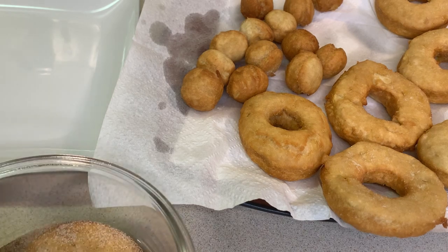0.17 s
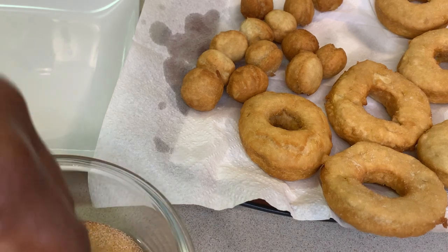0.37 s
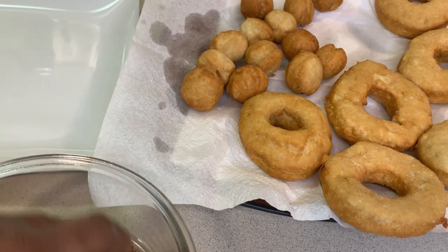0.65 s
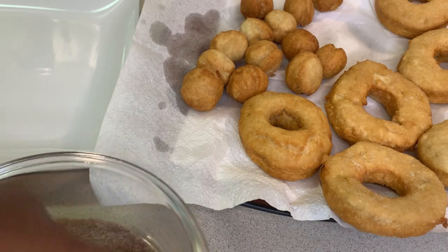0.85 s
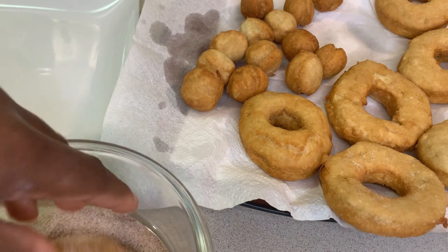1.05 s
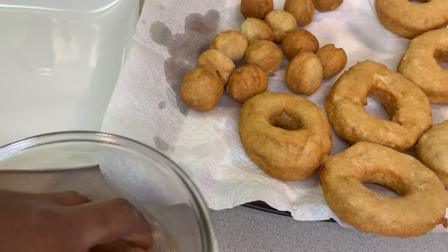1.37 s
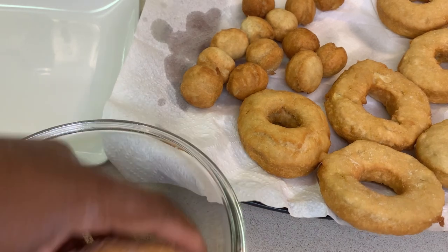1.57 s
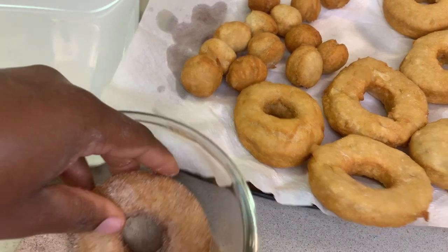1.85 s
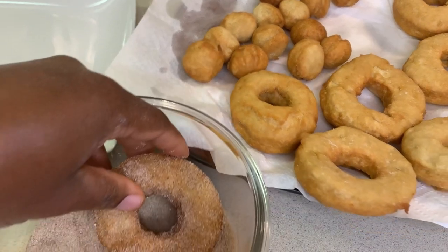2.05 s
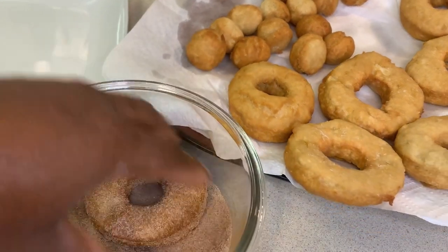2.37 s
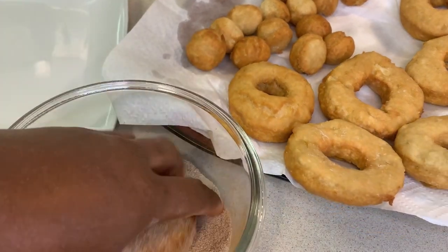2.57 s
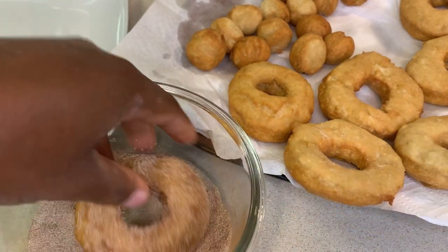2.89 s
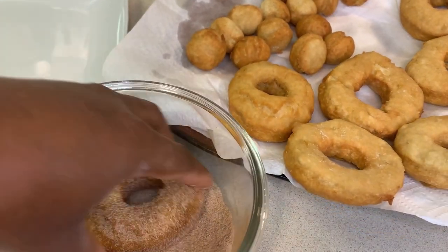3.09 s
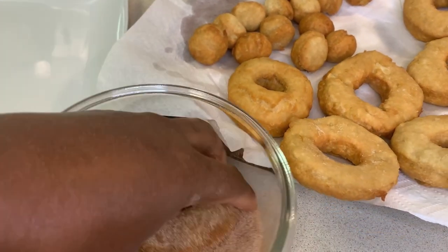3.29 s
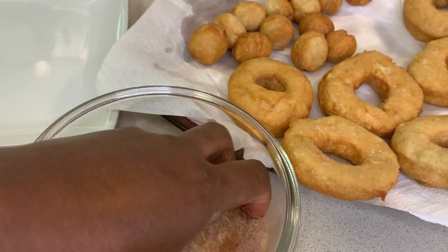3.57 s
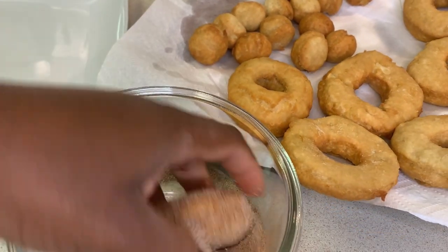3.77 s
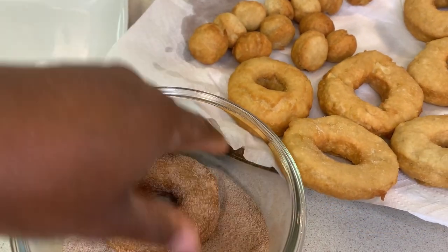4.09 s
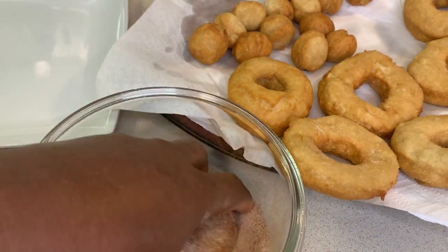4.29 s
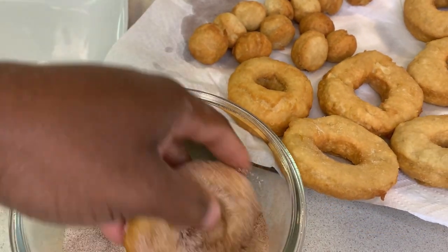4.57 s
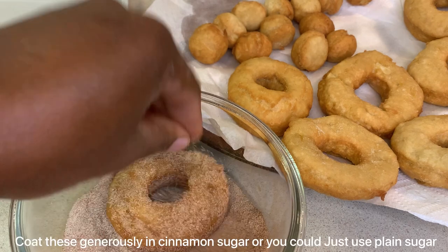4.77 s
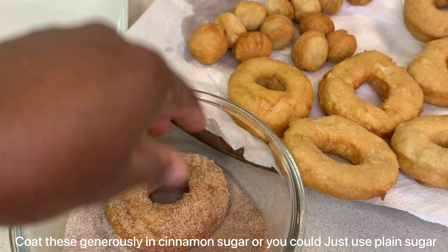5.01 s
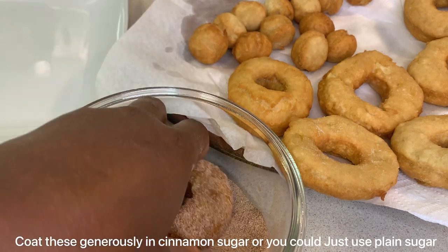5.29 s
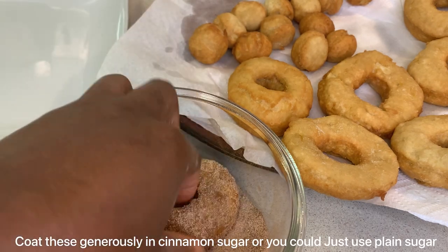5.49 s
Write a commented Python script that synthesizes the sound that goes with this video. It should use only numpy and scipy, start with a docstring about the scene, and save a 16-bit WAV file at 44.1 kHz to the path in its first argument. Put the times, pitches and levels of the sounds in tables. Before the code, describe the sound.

A doughnut is rustled through grainy sugar in a glass bowl, with crisp slaps, low thuds and two bright knocks over soft kitchen hum.

```python
"""Fingers rustle ticking sugar grains in a glass bowl over low kitchen hum, as friction drags the bowl.
From 0.7 s crust slaps sugar in crisp noise bursts, some over low counter thuds; near 1.5 s the bowl knocks
a baking tray, and near 1.9 s glass and counter ring: decaying modes under noise cracks. Stick-slip scrapes
follow at 2.1 s and 3.2 s, between them more slaps; a knuckle taps the held bowl near 3.7 s, then slaps and
thuds return until 4.8 s, and two last strokes end the scene. A nearby phone hears it all at two ports."""
import sys
import numpy as np
from scipy import signal
from scipy.fft import rfft, irfft, next_fast_len
from scipy.io import wavfile
from scipy.ndimage import uniform_filter1d

SR = 44100
rng = np.random.default_rng(int(sys.argv[2]) if len(sys.argv) > 2 else 0)


def dump(signal):
    """Clip the signal to [-1, 1] and save it as 16-bit WAV at the path in sys.argv[1]."""
    limited = np.clip(np.atleast_2d(signal).T, -1, 1)
    pcm = np.round(limited * 32767).astype(np.int16)
    wavfile.write(sys.argv[1], SR, pcm)


N = 248988
HZ = np.arange(next_fast_len(N) // 2 + 1) * SR / next_fast_len(N) + 1e-3  # frequency bins, kept off zero
PORT_LAG_S = 2.3e-4  # sound from the bowl reaches the right port later


def undb(db):
    """Decibels to amplitude."""
    return 10 ** (np.asarray(db) / 20)


def unit(x):
    """Scale to an RMS of 1."""
    return x / np.sqrt(np.mean(x ** 2))


def over_hz(table):
    """Read a (freq_hz, value) table at every frequency bin, straight between points on a log axis."""
    hz, value = np.transpose(table)
    return np.interp(np.log(HZ), np.log(hz), value)


def colour(x, gain):
    """Filter by a gain for each frequency bin."""
    size = next_fast_len(N)
    return irfft(rfft(x, size) * gain, size)[..., :N]


def band(x, lo_hz, hi_hz):
    """Gentle band-pass."""
    sos = signal.butter(2, [lo_hz, hi_hz], "bandpass", fs=SR, output="sos")
    return signal.sosfilt(sos, x)


def walk(rate):
    """Random levels held 1 / rate s and slewed twice; RMS 1."""
    hold = int(SR / rate)
    levels = np.repeat(rng.standard_normal(N // hold + 1), hold)
    return unit(uniform_filter1d(uniform_filter1d(levels, hold), hold)[:N])


def add(out, s, sound):
    """Mix a sound into out from s seconds on."""
    i = int(s * SR)
    out[..., i:i + sound.shape[-1]] += sound[..., :N - i]


def ports(x, lag_s, alike=0.97):
    """One source at two microphone ports: the right hears it lag_s later, partly by another path."""
    direct, other = x if x.ndim > 1 else (x, x)
    alike = np.clip(alike, 0, 1)
    late = np.exp(-2j * np.pi * HZ * lag_s)
    right = colour(direct, alike * late) + colour(other, np.sqrt(1 - alike ** 2) * late)
    return np.array([direct, right])


def ring(modes, dull_db, until_s, rung_s=0, soft_cycles=0, opposed=False, waver_db=0):
    """Decaying modes swell over the contact, and the next touch, until_s later, stops them."""
    t = np.arange(int(.5 * SR)) / SR
    hz, db, t60, pan_db, lead = np.array(modes).T[:, :, None]
    # dull_db per octave above 500 Hz; a negative value brightens
    gain = undb(db - dull_db * np.log2(np.maximum(hz / 500, 1))) * np.exp(-np.log(1000) * t / t60)
    # loose contact: random level steps, smoothed, make each mode die away unevenly
    steps = np.repeat(rng.standard_normal((len(hz), 40)), len(t) // 40 + 1, axis=1)[:, :len(t)]
    gain = gain * undb(waver_db * uniform_filter1d(steps, len(t) // 40, axis=1))
    # a body that has rung for rung_s keeps in step; in a flat or held one neighbours start opposed
    start = 2 * np.pi * hz * rung_s + opposed * np.pi * np.arange(len(hz))[:, None]
    start = start + np.array([lead, -lead]) / 2
    sides = undb(np.array([pan_db, -pan_db]) / 2)
    # a soft touch needs soft_cycles more to set a mode going, so the low ones come late
    swell = 1 - np.exp(-t / (0.0011 + soft_cycles / hz))
    stop = np.exp(-np.maximum(t - until_s, 0) / 0.003)
    return np.sum(swell * stop * sides * gain * np.sin(2 * np.pi * hz * t + start), axis=1)


# appliance spectrum, relative: freq_hz, density_db (per Hz)
KITCHEN_SPECTRUM = [(18, -56), (30, -43), (50, -4), (80, 1.5), (105, 0.5), (190, -6.5), (245, -0.5),
                    (440, -3), (575, -18.5), (890, -11.5), (1330, -24), (2500, -24.5), (7000, -25.5),
                    (16000, -59.5)]
# how alike the hum is at the two ports: freq_hz, likeness (0 to 1)
KITCHEN_LIKENESS = [(60, 0.95), (130, 0.98), (290, 0.72), (640, 0.52), (1100, 0.1), (2500, 0.474),
                    (5000, 0.059)]
KITCHEN_DB = -57.5  # middle level, before the phone


def kitchen():
    """Steady appliance rumble: shaped noise, its bass alike at both ports, its level wavering a little."""
    air = ports(rng.standard_normal((2, N)), PORT_LAG_S, alike=over_hz(KITCHEN_LIKENESS))
    hum = unit(colour(air, undb(over_hz(KITCHEN_SPECTRUM))))
    return hum * undb(KITCHEN_DB + 1.75 * walk(9.2))


# reverberation, each band taking the mean of its two edges: freq_hz, t60_s
ROOM_DECAY = [(150, 0.21), (600, 0.19), (2000, 0.48), (6000, 0.068), (15000, 0.12)]
ROOM_DB = -19  # tail energy


def room(x):
    """Hard kitchen walls: a noisy tail whose bands each die away at their own pace, soonest in the treble."""
    t, tail = np.arange(int(.5 * SR)) / SR, 0
    for (lo_hz, lo_t60), (hi_hz, hi_t60) in zip(ROOM_DECAY, ROOM_DECAY[1:]):
        both, apart = rng.standard_normal((2, len(t)))
        # long waves reach both ports alike
        paths = both + min(lo_hz / 600, 1) * apart * np.array([[1], [-1]])
        tail = tail + band(paths, lo_hz, hi_hz) * np.exp(-2 * np.log(1000) * t / (lo_t60 + hi_t60))
    tail = tail * (1 - np.exp(-t / 0.0025))
    tail = tail / np.sqrt(np.sum(tail ** 2, axis=1, keepdims=True))
    return undb(ROOM_DB) * signal.fftconvolve(x, tail, axes=1)[:, :N]


# doughnut and bowl on the counter: start_s, level_db (before the slow rise), pitch_hz, t60_s
THUDS = [(0.678, -30, 92.5, 0.08), (1.045, -28, 93.4, 0.082), (1.258, -48, 93, 0.11),
         (1.359, -39, 98, 0.11), (1.508, -14, 98, 0.044), (1.884, -33.5, 72.4, 0.13),
         (2.155, -52, 104, 0.66), (2.959, -22.5, 88.4, 0.086), (3, -25, 88, 0.057),
         (4.016, -27.5, 90, 0.078), (4.131, -43, 92, 0.079), (4.749, -20, 98, 0.073),
         (4.785, -24.5, 95, 0.052)]


def thuds():
    """The counter swings a few slow cycles after a soft push: decaying low sines with a slow rise."""
    out, t = np.zeros(N), np.arange(int(.4 * SR)) / SR
    for s, db, hz, t60 in THUDS:
        swell = (1 - np.exp(-t / 0.025)) * np.exp(-np.log(1000) * t / t60)
        add(out, s, undb(db) * swell * np.sin(2 * np.pi * hz * t))
    return ports(out, lag_s=1e-4)


# strokes of hand, crust and bowl:
# peak_s, rise_s, fall_s, rustle_db, fineness_db (per octave), drag_db
STROKES = [(0.04, 0.11, 0.058, -58, -2, -58.5), (0.18, 0.057, 0.17, -67, -4, -83),
           (0.45, 0.057, 0.11, -60.5, 0.5, -66), (0.63, 0.053, 0.064, -53, -2.2, -57.5),
           (0.83, 0.057, 0.1, -52, 0.5, -58.5), (1.0, 0.088, 0.13, -65.5, -5, -58),
           (1.26, 0.062, 0.091, -58, -4.5, -60), (1.471, 0.057, 0.081, -55, 2, -49),
           (1.63, 0.058, 0.064, -56.5, 1, -60), (1.861, 0.075, 0.094, -58.5, -2, -49),
           (2.13, 0.075, 0.11, -59.5, -2, -51.5), (2.384, 0.01, 0.063, -57.5, -2, -63),
           (2.545, 0.034, 0.11, -58.5, -1, -59), (2.711, 0.037, 0.097, -58, 1, -64),
           (2.9, 0.031, 0.087, -67, -0.5, -62), (3.23, 0.11, 0.09, -61.5, 4, -53.5),
           (3.56, 0.074, 0.029, -60, -3, -68), (3.86, 0.27, 0.16, -62.5, 1.5, -61),
           (4.131, 0.023, 0.08, -61, 0.5, -61), (4.24, 0.056, 0.058, -67.5, 4, -61.5),
           (4.47, 0.034, 0.1, -58.5, 5, -59.5), (4.6, 0.037, 0.031, -61, -2, -70),
           (4.69, 0.022, 0.02, -64, 4, -63.5), (4.791, 0.034, 0.1, -65.5, 2.1, -68.5),
           (5.39, 0.067, 0.042, -61, -1, -62.5), (5.48, 0.025, 0.015, -77.5, 1.5, -58.5)]


def strokes(peak_db, rest_db):
    """Each stroke swells and dies away like a bell curve; overlaps and the rest level add in power."""
    s, rise_s, fall_s = np.array(STROKES).T[:3, :, None]
    since = np.arange(N) / SR - s
    swell = np.exp(-(since / np.where(since < 0, rise_s, fall_s)) ** 2)
    return np.sqrt(undb(peak_db) ** 2 @ swell + undb(rest_db) ** 2)


# broad resonances of the loaded bowl: freq_hz, width_hz, level_db (relative)
DRAG_MODES = [(351, 300, 10.5), (758, 180, 9.5), (1070, 570, 1.5), (1546, 340, -2.5), (2177, 330, -26),
              (2800, 490, -21.5)]
DRAG_REST_DB = -73  # between strokes


def drag():
    """Uneven friction excites the broad resonances of the loaded bowl, now one and now another."""
    grit = rng.standard_normal((2, N)) * undb(2.0 * walk(60))
    rub = 0
    for hz, width, db in DRAG_MODES:
        resonance = colour(grit, 1 / (1 + 2j * (HZ - hz) / width))
        rub = rub + undb(db + 2.2 * walk(30.05)) * resonance
    peak_db = [row[5] for row in STROKES]
    return ports(unit(rub) * strokes(peak_db, DRAG_REST_DB), PORT_LAG_S, alike=0.27)


# spectrum of the sugar ticks, relative: freq_hz, density_db (per Hz)
GRAIN_SPECTRUM = [(1500, -11), (2500, -4.5), (4000, 0.5), (6000, -1.5), (8000, -2.5), (10300, 4),
                  (13000, 1), (15800, 2.5)]
SUGAR_REST_DB = -74.5  # between strokes


def sugar():
    """Grains of uneven size tick; each size comes in its own patches, each stroke has its own fineness."""
    sizes = np.minimum(rng.exponential(size=(2, N)), 5)
    ticks = rng.standard_normal((2, N)) * undb(3.0 * sizes + 1.83 * walk(110))
    ticks, hiss = unit(colour(ticks, undb(over_hz(GRAIN_SPECTRUM)))), 0
    rustle_db, fine_db = np.array(STROKES).T[3:5]
    fineness = np.interp(np.arange(N) / SR, [row[0] for row in STROKES], fine_db)
    for hz in np.arange(0, 18000, 1500):
        share = np.clip(1 - abs(HZ - hz) / 1500, 0, 1)  # overlapping bands, one for each grain size
        octaves = np.log2(max(hz, 1500) / 6000)
        hiss = hiss + colour(ticks, share) * undb(1.9 * walk(26) + fineness * octaves)
    return ports(hiss * strokes(rustle_db, SUGAR_REST_DB), PORT_LAG_S, .6)


# modes of the bowl while the hand damps it:
# pitch_hz, level_db (relative), t60_s, pan_db (left minus right), left_lead_rad
HELD_BOWL = [(248, -44, .14, 2, 0), (350, -40, .14, 4, 0), (402, -49, .12, 2, 0), (467, -46, .1, 2, .3),
             (605, -43, .055, 0, .5), (800, -48, .045, 0, 0), (1247, -61, .2, 0, 0),
             (1320, -54, .05, 0, .4), (1252, -42, .035, 0, 0), (1550, -54, .04, -2, 0),
             (1980, -54, .03, -2, 0)]
# crust scraping round the held bowl: peak_s, half_length_s, level_db
SCRAPES = [(2.13, 0.076, -57), (3.204, 0.056, -58.5), (3.274, 0.04, -61), (3.326, 0.033, -59)]
SLIPS_PER_S = 900


def scrapes():
    """Stick-slip clicks of uneven size set the held bowl sounding, with its upper modes favoured."""
    s, half_s, db = np.array(SCRAPES).T[:, :, None]
    swell = np.sum(undb(db) * np.exp(-((np.arange(N) / SR - s) / half_s) ** 2), axis=0)
    slips = (rng.random(N) < SLIPS_PER_S / SR) * rng.standard_normal(N) * undb(3.5 * walk(40))
    body = ring(HELD_BOWL, dull_db=-5.5, until_s=0.052)
    return unit(signal.fftconvolve(slips[None], body, axes=1)[:, :N]) * swell


TAP_S, TAP_DB, TRAY_WAVER_DB = 3.661, -4, 3.5  # the tap's modes waver as much as the tray's


def tap():
    """A knuckle softly taps the held bowl, whose low modes come late."""
    out = np.zeros((2, N))
    bowl = ring(HELD_BOWL, dull_db=-1.5, until_s=1, soft_cycles=0.99, opposed=True,
                waver_db=TRAY_WAVER_DB)
    add(out, TAP_S, undb(TAP_DB) * bowl)
    return out


# slaps and crackles of sugared crust:
# start_s, level_db, pat_db (against the crunch), length_ms, crunch_hz
SLAPS = [(0.685, -46.5, -15, 4.8, 7500), (1.034, -51, -1, 19, 7550), (1.101, -50.5, -20, 7, 6670),
         (2.463, -55, 3, 3.2, 3970), (2.5306, -50, -16, 5, 9000), (2.9536, -43.5, 2.5, 17, 7100),
         (3.013, -58, -18, 27, 5400), (3.8206, -54, 12, 7, 3600), (3.938, -39.5, -16, 5.5, 6400),
         (3.9948, -38, 1.5, 6.6, 9200), (3.999, -41, 0.5, 17.7, 8260), (4.036, -55.5, -11, 28, 8600),
         (4.062, -40, -1, 2.2, 9000), (4.3047, -45.5, -8.5, 6.6, 3840), (4.742, -45, 0.5, 12.6, 8400)]


def slaps():
    """Crust meets sugar: a noise burst of crushed grains over a duller pat."""
    out, t = np.zeros((2, N)), np.arange(int(.06 * SR)) / SR

    def shape(ms):
        """Quick rise, then a bell-curve fall to about 3 percent after ms."""
        return (1 - np.exp(-t / 0.0014)) * np.exp(-(1900 * t / ms) ** 2)

    for s, db, pat_db, ms, hz in SLAPS:
        crisp, soft = rng.standard_normal((2, 2, len(t)))
        grains = crisp * undb(3.5 * rng.exponential(size=len(t)))
        crunch = shape(ms) * unit(band(grains, hz / 2.06, min(1.56 * hz, 17000)))
        pat = shape(0.99 * ms) * unit(band(soft, 250, 1820) + 2.1 * band(soft, 694, 814))
        add(out, s, undb(db) * (crunch + undb(pat_db) * pat))
    return ports(out, PORT_LAG_S, .6)


# ringing modes of glass bowl, baking tray and counter, relative to each blow:
# pitch_hz, level_db, t60_s, pan_db (left minus right), left_lead_rad
GLASS = [(1209, -39, 0.37, -3, 0.0), (1403, -29.5, 0.55, 3, -0.2), (1407.7, -40, 0.62, -5, 2.9),
         (2309, -36, 0.15, 0, -1.5), (2321, -23.5, 0.18, -2, -2.1), (2324.8, -39.5, 0.7, -1, -2.1),
         (2768, -37, 0.26, 0, 1), (2784, -24, 0.15, 1, 1.5), (2826, -34, 0.12, 7, 1.6),
         (2975, -42, 0.14, -2, -1.4), (3594, -41, 0.27, -1, -1.6), (3858, -48, 0.3, -1, 0.6),
         (4772, -43, 0.2, 2, 0.8), (4818, -45, 0.26, -1, 0.4), (4958, -35, 0.11, 0, -0.7),
         (5928, -43, 0.27, -5, 0.1), (6295, -48, 0.27, -2, -0.1), (6925, -56, 0.12, 0, 0),
         (7555, -40, 0.15, -4, -2.1), (8700, -52, 0.1, 0, 0), (9264, -56, 0.33, 0, 2.6),
         (9480, -58, 0.15, 0, 0), (10328, -53, 0.23, -1, 0.7), (11021, -59, 0.25, 0, 0.0),
         (11820, -58, 0.15, 0, 0), (12186, -50, 0.17, -1, -1.4), (12919, -57, 0.21, -2, -2.2),
         (13802, -54, 0.11, -1, 2.1), (14300, -56, 0.12, 0, 0), (15624, -54, 0.1, 0, 0.0)]
TRAY = [(214, -40, 0.17, -1, 0), (285, -38, 0.13, 0, 0), (312, -37, 0.12, 1, 0.3), (450, -40, 0.25, 1, 0),
        (604, -37, 0.08, 0, 1.2), (678, -30, 0.14, -4, 1.6), (735, -41, 0.3, -5, 0.5),
        (894, -40, 0.08, 0, 1), (1043, -37, 0.09, 0, -1), (1143, -33, 0.31, 0, 0.8),
        (1171, -23, 0.13, -3, -0.9), (1282, -36, 0.08, 1, 1), (1390, -36, 0.08, 0, 0),
        (1515, -35, 0.09, -1, 0.6), (1749, -28, 0.19, -3, -0.0), (1780, -38, 0.22, -1, -0.0),
        (1914, -30, 0.16, -3, -0.1), (1937, -27, 0.16, -1, -0.2), (1993, -37, 0.1, 0, 0),
        (2170, -39, 0.05, 0, 1), (2290, -36, 0.06, 0, -1), (2430, -44, 0.07, 0, 0.5),
        (2560, -39, 0.23, -1, -1.0), (2599, -41, 0.26, 1, -0.3), (2766, -38, 0.3, -2, 1.4),
        (2884, -46, 0.3, 0, 0), (2906, -41, 0.25, 2, -0.6), (3042, -44, 0.25, 0, 0),
        (3134, -43, 0.2, 5, 0.6), (3300, -50, 0.08, 0, 0), (3565, -41, 0.14, 3, 0.3),
        (3650, -46, 0.1, 0, 0), (3918, -42, 0.2, 3, -1.4), (4030, -50, 0.2, 0, 0), (4360, -52, 0.12, 0, 0),
        (4490, -51, 0.15, 0, 0), (4810, -48, 0.24, 0, 0), (4955, -47, 0.26, 3, -2.2),
        (6164, -56, 0.09, -3, -0.2), (7115, -60, 0.13, 0, 0), (7610, -53, 0.15, 4, -2.4)]
COUNTER = [(229, -36, .13, 0, 0), (325, -39, .08, 0, .3), (410, -42, .16, 0, 0), (627, -39, .25, 1, 1.4),
           (700, -37, .08, 0, 1), (870, -37, .06, 0, .8), (1086, -29, .11, 0, .6),
           (1156, -19.5, .075, 3, -1.0), (1248, -31, .13, 0, -.2), (1640, -31, .04, 0, 0)]
# knocks: start_s, glass_db, tray_db, counter_db, crack_db, crack_treble_db (against the crack),
# dulling_db (per octave above 500 Hz)
KNOCKS = [(1.4932, -37, 2.5, -4, -15, -24.5, 0.5), (1.4955, -32.5, 5, 1, -11, -19, 0.5),
          (1.501, -29.5, 4.5, 0, -13, -26.5, 5), (1.5105, -29, 2, -13.5, -12.5, -33, 1.5),
          (1.8727, 1.5, -37, 8.5, -13.5, -13, 0.5), (1.8854, 3, -33, 4.5, -17.5, -9.5, 0.96),
          (3.661, -42, -59, -28, -43, -40, 6.5)]
WAVER_DB = 1.1  # glass and counter


def knocks():
    """Each blow rings glass, tray and counter with a noise crack; bounces keep glass and tray ringing."""
    out, t = np.zeros((2, N)), np.arange(int(.15 * SR)) / SR
    gaps, rung_s = np.diff([row[0] for row in KNOCKS], append=N / SR), 0
    for (s, glass_db, tray_db, counter_db, crack_db, treble_db, dull_db), gap in zip(KNOCKS, gaps):
        glass = ring(GLASS, dull_db, gap, rung_s, waver_db=WAVER_DB)
        tray = ring(TRAY, dull_db, gap, rung_s, opposed=True, waver_db=TRAY_WAVER_DB)
        counter = ring(COUNTER, dull_db, gap, waver_db=WAVER_DB)
        for body, db in ((glass, glass_db), (tray, tray_db), (counter, counter_db)):
            add(out, s, undb(db) * body)
        rung_s = rung_s + gap if gap < .05 else 0  # a close next blow is a bounce

        both, apart = rng.standard_normal((2, len(t)))
        noise = both + .5 * apart * np.array([[1], [-1]])
        fall = np.exp(-t / 0.0024) + 0.14 * np.exp(-t / 0.038)  # crack, then a brief rattle
        burst = noise * (1 - np.exp(-t / 0.00051)) * fall
        middle = band(band(burst, 190, 3280), 200, 2900)
        treble = undb(treble_db) * band(burst, 8400, 14500)
        add(out, s, undb(crack_db) * (middle + treble))
    return band(out, 150, 18000)


def scene():
    """Mix all layers; knocks, tap and slaps also excite the room."""
    hits, soft = knocks() + tap(), slaps()
    echoes = room(hits + 1.8 * soft)
    return kitchen() + echoes + thuds() + drag() + sugar() + scrapes() + soft + hits


# balance of the phone's ports: freq_hz, pan_db (left minus right)
PORT_BALANCE = [(60, 0), (200, -.5), (380, 1.5), (700, 1.5), (1290, 2.5), (2380, 1), (4400, -2),
                (5700, -2.5), (8120, 0), (15000, 0)]
MONO_ABOVE_HZ, TREBLE_LAG_S, TREBLE_IN_STEP_HZ = 6300, 2.06e-4, 10950
TOP_HZ = 15900  # steep upper limit


def record(dry):
    """Two ports in bass and middle; both treble sides are mostly the left port, later on the left."""
    mono = .93 / (1 + (MONO_ABOVE_HZ / HZ) ** 16)  # share of right-side power taken from the left port
    ahead = np.exp(2j * np.pi * TREBLE_LAG_S * (HZ - TREBLE_IN_STEP_HZ))
    tilt = undb(over_hz(PORT_BALANCE) / 2)
    left = colour(dry[0], tilt)
    right = colour(dry[1], np.sqrt(1 - mono) / tilt) + colour(dry[0], np.sqrt(mono) * ahead / tilt)
    low_pass = signal.ellip(10, .2, 70, TOP_HZ, fs=SR, output="sos")
    return signal.sosfilt(low_pass, np.array([left, right]))


dry = scene()
out = record(dry)
dump(out)
```